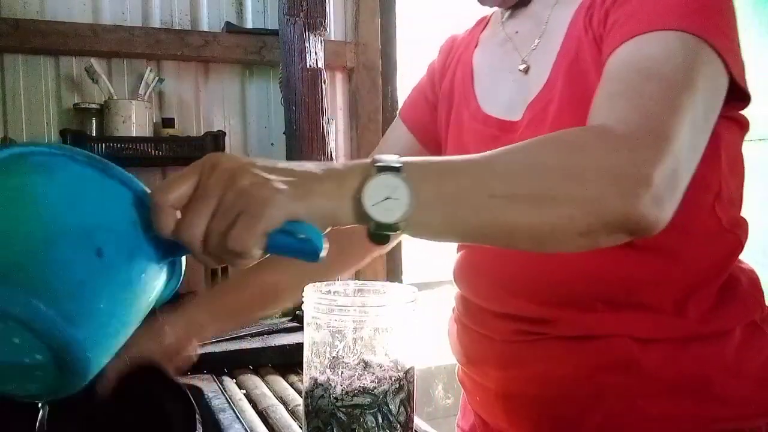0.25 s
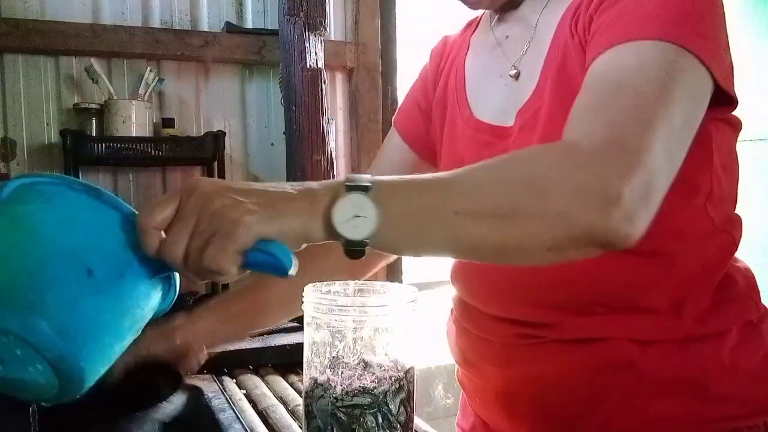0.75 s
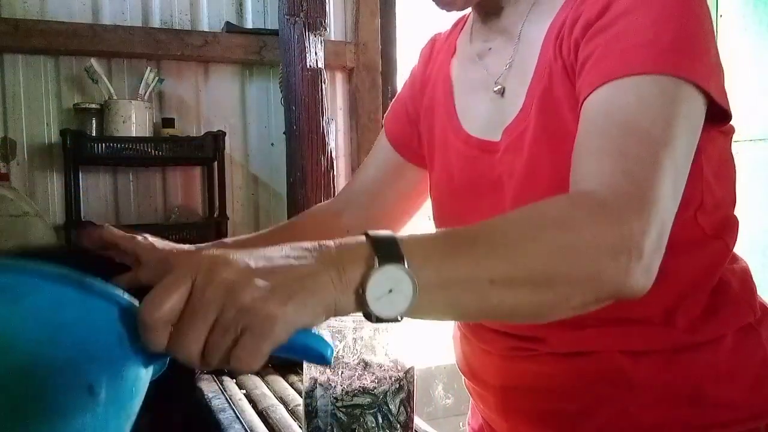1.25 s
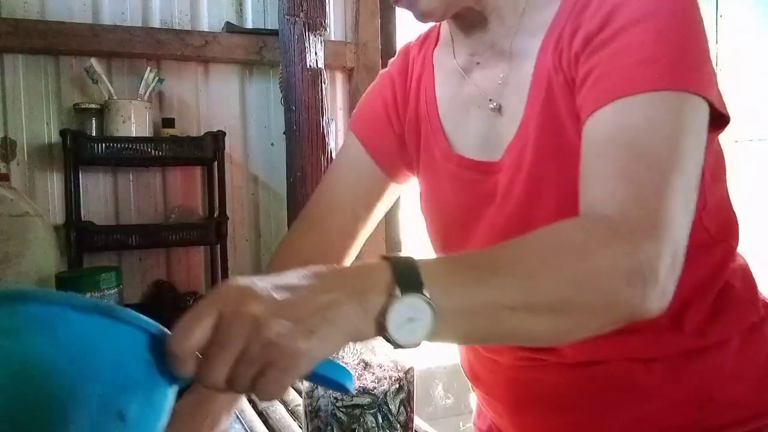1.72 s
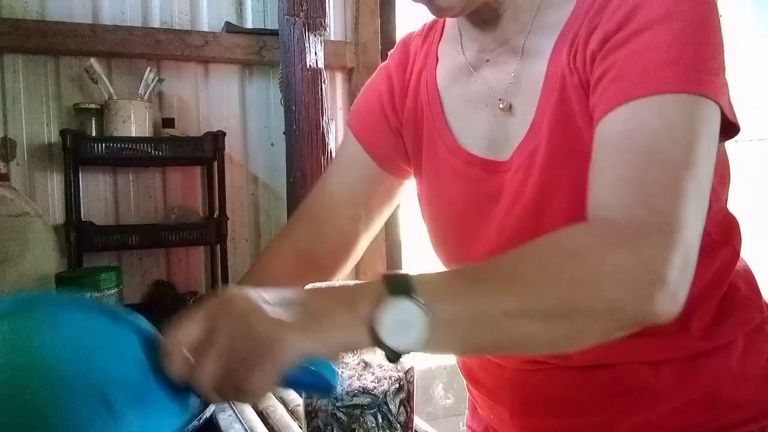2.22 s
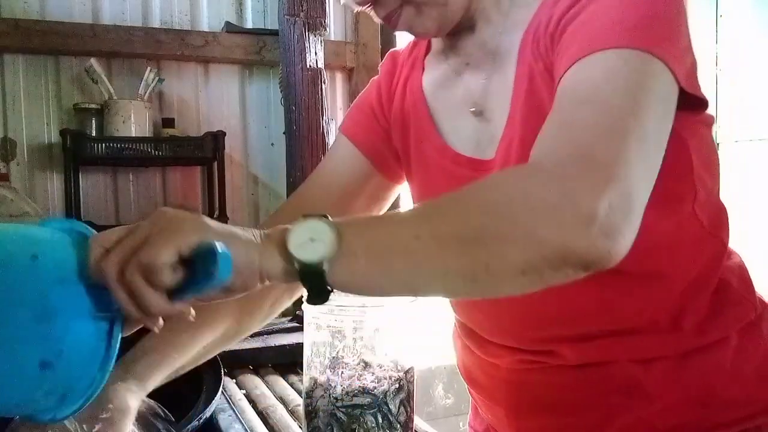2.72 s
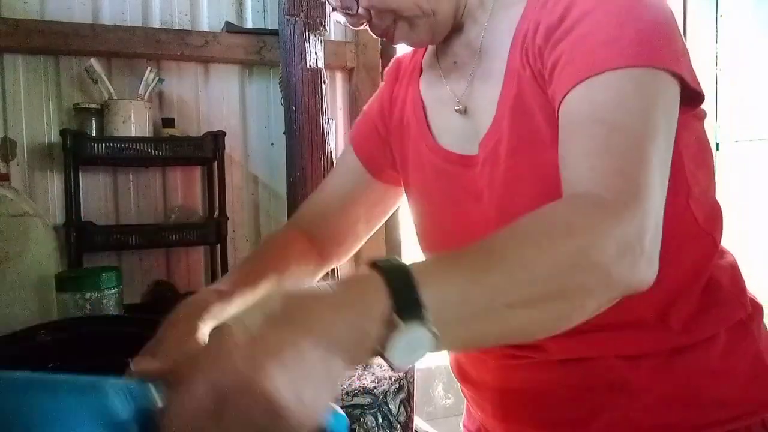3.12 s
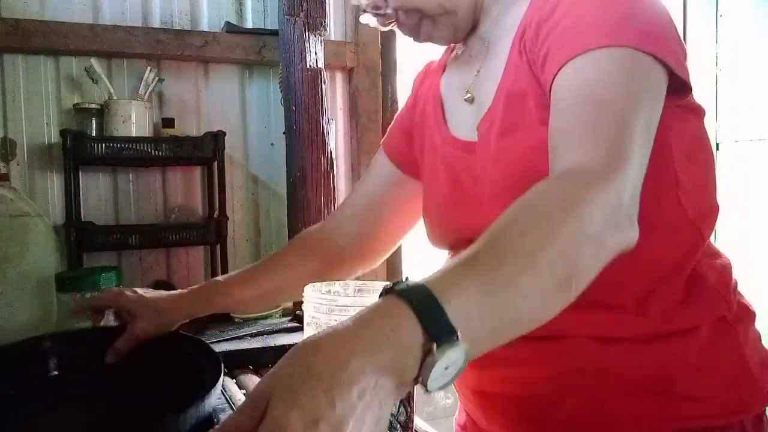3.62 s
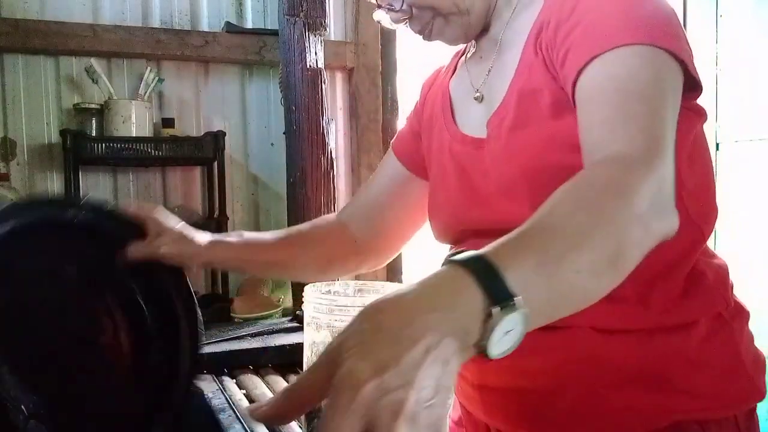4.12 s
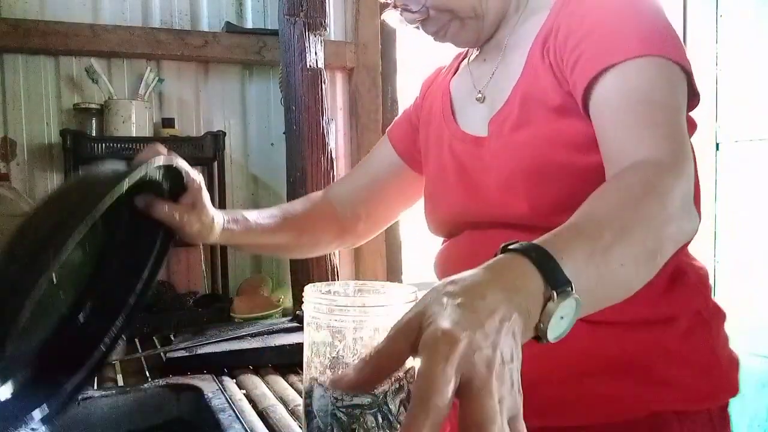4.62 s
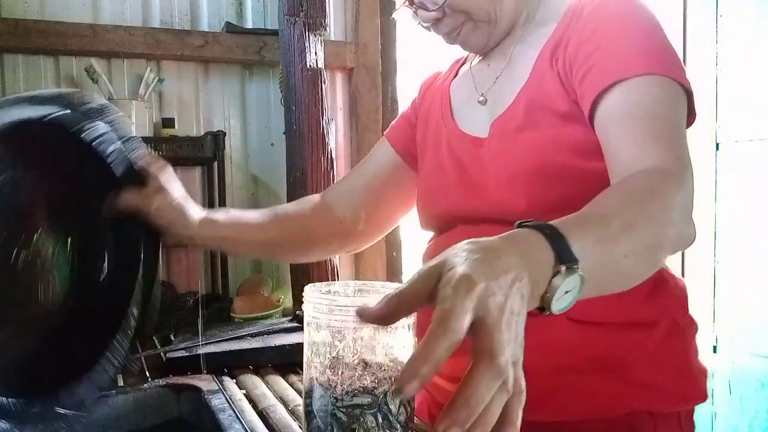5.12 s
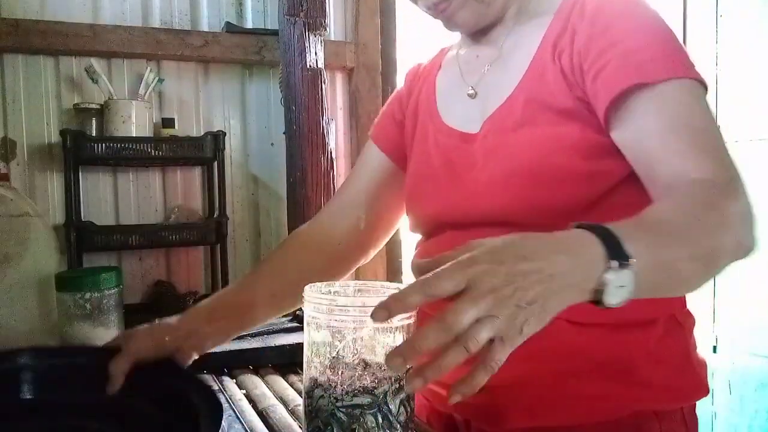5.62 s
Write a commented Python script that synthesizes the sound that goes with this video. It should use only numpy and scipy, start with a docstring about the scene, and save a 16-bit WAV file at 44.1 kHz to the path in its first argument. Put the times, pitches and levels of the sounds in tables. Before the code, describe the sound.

Close, at a sink in a small metal shed, water trickles and drips as a plastic dipper knocks a hollow basin. A tight cluster of booming bumps and a juddering shove comes early, then a bright splashing pour with gurgles. The water thins to drips and plops before a few ringing knocks on the emptied basin. Mono, with faint low rumble and hiss.

```python
"""A sink in a small sheet-metal shed: a plastic dipper bumps about in a basin and is poured out.
Water sprays, gurgles, plops and drips, built from swarms of bubbles, filtered noise and short rings.
Knocks are decaying modes plus bursts of noise; shoves of the basin judder as random slips ring its sides.
The last knocks fall on the drained basin and boom less but ring more. Low rumble and hiss lie under it all."""
import sys
import numpy as np
from scipy import signal
from scipy.fft import rfft, irfft, next_fast_len
from scipy.io import wavfile
from scipy.ndimage import map_coordinates

SR = 44100
rng = np.random.default_rng(int(sys.argv[2]) if len(sys.argv) > 2 else 0)


def transcribe(signal):
    """Save signal, clipped to [-1, 1], as a 16-bit WAV file at the path in sys.argv[1]."""
    frames = np.atleast_2d(signal).T
    limited = np.clip(frames, -1, 1)
    pcm = np.round(limited * 32767).astype(np.int16)
    wavfile.write(sys.argv[1], SR, pcm)


N = 258249  # length in samples


def amp(db):
    """Decibels to gain."""
    return 10 ** (np.asarray(db) / 20)


def unit(x):
    """Scaled to rms 1."""
    return x / np.sqrt(np.mean(x ** 2) + 1e-20)


def strike(x, window_s):
    """A blow scaled to rms 1 over its first moments."""
    return x / np.sqrt(np.mean(x[:int(window_s * SR)] ** 2) + 1e-20)


def along(points, hz):
    """(Hz, value) points read on a log axis."""
    f, v = np.transpose(points)
    return np.interp(np.log(hz + 1), np.log(f + 1), v)


def curves(rows):
    """One value per sample for each column after the time."""
    s, *cols = np.transpose(rows)
    return [np.interp(np.arange(N) / SR, s, c) for c in cols]


def fade(t, t60):
    """Gain of a ring that loses 60 dB in t60 seconds."""
    return np.exp(-np.log(1000) * t / t60)


def onset(t, rise_s):
    """Gain that swells from nothing towards 1 with time constant rise_s."""
    return 1 - np.exp(-t / rise_s)


def swells(rows, attack_s, t60):
    """Gain of (s, hold s, dB) events that each rise, hold and die away."""
    t = np.arange(N) / SR
    total = np.zeros(N)
    for s, hold, db in rows:
        attack = np.clip((t - s) / attack_s, 0, 1)
        release = fade(np.maximum(t - s - attack_s - hold, 0), t60)
        total += amp(db) * attack * release
    return total


def wobble(rate):
    """A smooth random curve, rate knots a second."""
    knots = rng.standard_normal(int(N * rate / SR) + 4)
    return map_coordinates(knots, [np.arange(N) * rate / SR])


def add(track, s, sound):
    """Mix a sound into the track at time s."""
    start = min(max(round(s * SR), 0), N)
    track[start:start + len(sound)] += sound[:N - start]


def colour(x, spectrum):
    """Causal minimum-phase filter with the given (Hz, dB) response, made by folding its cepstrum."""
    m = next_fast_len(len(x) + 4096, True)
    cepstrum = irfft(np.log(amp(along(spectrum, np.fft.rfftfreq(m, 1 / SR)))), m)
    cepstrum[1:m // 2] *= 2
    cepstrum[m // 2 + 1:] = 0
    return irfft(rfft(x, m) * np.exp(rfft(cepstrum)), m)[:len(x)]


def noise(spectrum, size):
    """Coloured noise of rms 1."""
    return unit(colour(rng.standard_normal(size), spectrum))


def resonate(x, hz, q):
    """One resonance of quality q."""
    return signal.lfilter(*signal.iirpeak(min(hz, SR / 2.5), max(q, 1), SR), x)


def ringing(modes, t):
    """Decaying modes, rms 1 at first; water and grip shift them a little from blow to blow."""
    chance = rng.standard_normal((len(modes), 3))
    total = np.zeros(len(t))
    for (hz, db, t60), (level, pitch, phase) in zip(modes, chance):
        wave = np.sin(2 * np.pi * hz * (1 + 0.00995 * pitch) * t + np.pi * phase)
        total += amp(db + 2 * level) * fade(t, t60) * wave
    return strike(total, 0.084)


def bubble(t, hz, cycles, rise):
    """A damped sine whose pitch climbs, for rise above 0, as the bubble nears the surface."""
    age = t * hz / cycles
    return np.sin(2 * np.pi * hz * t * (1 + rise * age / (2 + age))) * np.exp(-age)


def grains(rate, hz, spread, cycles, scatter_db, rise, size):
    """A steady swarm, rate a second, of size-sample bubbles of random pitch and strength, rms 1."""
    u = rng.random((int(rate * N / SR), 4))
    pitch = np.clip(hz * np.exp(spread * (u[:, 1:2] + u[:, 2:3] - 1)), 100, SR / 2.5)
    strength = amp(-scatter_db * np.log(0.02 + 0.98 * u[:, 3:]))  # many weak, few strong
    waves = strength * bubble(np.arange(size) / SR, pitch, cycles, rise)
    at = (u[:, :1] * N).astype(int) + np.arange(size)
    return unit(np.bincount(at.ravel(), waves.ravel(), N)[:N])


# how long the metal walls ring on. Each row: frequency in Hz, t60 in seconds
SHED_DECAY = [(100, 1), (400, 0.51), (1500, 0.19), (6000, 0.17), (15000, 0.18)]


def shed(x, wet_db):
    """Direct sound plus the walls' answer 2.7 ms later, whose treble dies sooner than its bass."""
    hz, t, z = signal.stft(rng.standard_normal(SR // 2), SR, nperseg=256)
    tail = signal.istft(z * fade(t, along(SHED_DECAY, hz)[:, None]), SR, nperseg=256)[1]
    tail = np.pad(tail / np.linalg.norm(tail), (int(0.0027 * SR), 0))
    return x + amp(wet_db) * signal.fftconvolve(x, tail)[:len(x)]


# low outdoor rumble. Each row: frequency in Hz, relative level in dB per Hz
RUMBLE_SPECTRUM = [(15, -68.5), (25, -38), (86, 2.5), (119, -9.5), (183, -3.5), (269, -25), (356, -30.5),
                   (469, -34), (574, -20.5), (680, -42.5), (1000, -51), (1300, -58), (2200, -120)]
# microphone hiss. Each row: frequency in Hz, relative level in dB per Hz
HISS_SPECTRUM = [(500, -35), (1500, 1), (3000, -18.5), (8000, 1.5), (13500, -18), (14500, -31.5),
                 (15300, -8), (16000, -1.5)]
RUMBLE_DB, HISS_DB = -62, -64


def background():
    """Low outdoor rumble and the microphone's hiss, both steady coloured noise."""
    return amp(RUMBLE_DB) * noise(RUMBLE_SPECTRUM, N) + amp(HISS_DB) * noise(HISS_SPECTRUM, N)


# water running off dipper and basin before the big pour. Each row: time in seconds, spray level in dB
TRICKLE_BEFORE_POUR = [(0.0, -46.5), (0.34, -71.5), (0.61, -59), (0.89, -44), (0.98, -46.5), (1.11, -49.5),
                       (1.61, -43.5), (1.78, -47.5), (2.43, -53), (2.7, -50)]
# the same after the big pour. Each row: time in seconds, spray level in dB
TRICKLE_AFTER_POUR = [(3.35, -52.5), (3.5, -54), (3.69, -44), (3.98, -52), (4.23, -47), (5.28, -53.5),
                      (5.85, -51)]


def trickle():
    """Level in dB of the running water before its flutter, one value per sample."""
    return curves(np.vstack([TRICKLE_BEFORE_POUR, TRICKLE_AFTER_POUR]))[0]


# the dipper tipped out. Each row: start in seconds, hold in seconds, spray level in dB before flutter
DIPPER_POURS = [(1.0, 0.032, -49.5), (2.73, 0.17, -37), (4.26, 0.023, -60)]
POUR_ATTACK_S, POUR_T60_S = 0.14, 1
# the basin's water set rocking. Each row: start in seconds, hold in seconds, gurgle level in dB
BASIN_SLOSHES = [(1.08, 0.23, -56), (1.65, 0.13, -44), (2.04, 0.15, -50), (2.86, 0.42, -50),
                 (3.72, 0.42, -56), (5.06, 0.24, -64.5)]
SLOSH_ATTACK_S, SLOSH_T60_S = 0.019, 0.37
# filter on the falling spray. Each row: frequency in Hz, relative gain in dB
SPRAY_FILTER = [(500, -24.5), (1200, -9.5), (2000, -10.5), (2700, -8), (3700, -6), (5200, -2), (6500, 4),
                (7500, 5), (9400, -5), (12200, -4), (13600, -6), (15000, 11), (16000, -13.5)]
# filter on bubbles under water. Each row: frequency in Hz, relative gain in dB
GURGLE_FILTER = [(150, -8.5), (350, 8), (700, -4.5), (1300, -3.5), (2200, -3.5), (3000, 2.5), (4500, 5.5),
                 (8000, -38.5)]
FLUTTER_PER_S, FLUTTER_DB = 22, 2.67  # the stream breaks up unevenly
# the gurgle under a spray of MID_FLOW_DB, and its dB per dB of spray
MID_FLOW_DB, GURGLE_DB, GURGLE_GROWS = -45, -64.5, 2.35


def water():
    """Falling water: a spray of tiny bursts and droplets over a gurgle of bubbles."""
    flow = np.hypot(amp(trickle()), swells(DIPPER_POURS, POUR_ATTACK_S, POUR_T60_S))
    flow = flow * amp(FLUTTER_DB * wobble(FLUTTER_PER_S))
    spray_db = 20 * np.log10(flow)
    # a stronger flow drives more air under; rocking water gurgles too
    driven = amp(GURGLE_DB + GURGLE_GROWS * (spray_db - MID_FLOW_DB))
    churn = np.hypot(driven, swells(BASIN_SLOSHES, SLOSH_ATTACK_S, SLOSH_T60_S))

    bursts = grains(rate=380, hz=7780, spread=1.78, cycles=1.0, scatter_db=9.5, rise=0, size=64)
    droplets = grains(rate=160, hz=4800, spread=0.9, cycles=4, scatter_db=4, rise=0.05, size=300)
    fizz = grains(rate=9000, hz=6000, spread=1.3, cycles=0.6, scatter_db=3, rise=0, size=48)
    # a trickle falls as separate droplets; in a full pour they merge into fizz
    merged = np.interp(spray_db, [-52, -40], [0.25, 0.85])
    separate = unit(bursts + amp(-2) * droplets)
    spray = np.sqrt(1 - merged) * separate + np.sqrt(merged) * fizz
    spray = colour(spray + amp(-12) * rng.standard_normal(N), SPRAY_FILTER)

    bubbles = grains(rate=600, hz=2100, spread=1.3, cycles=1.8, scatter_db=2.5, rise=0.15, size=900)
    gurgle = colour(bubbles + amp(-1.5) * rng.standard_normal(N), GURGLE_FILTER)
    return flow * unit(shed(spray, wet_db=-2)) + churn * unit(shed(gurgle, wet_db=0))


# the largest air pockets closing in the water. Each row: start in seconds, level in dB, pitch in Hz
AIR_POCKETS = [(0.051, -47.5, 1140), (0.241, -59.5, 1180), (0.58, -53, 5960), (0.868, -47, 2780),
               (0.955, -46, 2650), (0.975, -45.5, 2740), (1.076, -45.5, 2760), (2.106, -43, 2500),
               (2.472, -44, 2680), (3.843, -43, 1260), (4.326, -50.5, 1500), (4.4, -46, 1240),
               (4.52, -52, 505), (4.546, -56.5, 750), (4.563, -48.5, 1560), (4.675, -52, 1920),
               (4.842, -49.5, 2100), (4.936, -45.5, 1014), (5.123, -48, 980), (5.198, -54, 1350),
               (5.728, -38.5, 1090), (5.805, -40, 1240)]
# cycles of ring at 1 kHz, and the power of pitch by which smaller bubbles ring for more cycles
PLOP_CYCLES, PLOP_CYCLES_POWER = 3.5, 1.4
SLAP_DB = 1  # the slap of closing over the ring


def plops():
    """Larger bubbles slap shut and ring, rising in pitch."""
    out, t = np.zeros(N), np.arange(SR // 5) / SR
    for s, db, hz in AIR_POCKETS:
        cycles = PLOP_CYCLES * (hz / 1000) ** PLOP_CYCLES_POWER
        gulp = bubble(t, hz, cycles, rise=0.23) * onset(t, 0.00018)
        slap = resonate(noise(GURGLE_FILTER, len(t)) * fade(t, 0.1), hz, q=6)
        plop = shed(unit(gulp) + amp(SLAP_DB) * unit(slap), wet_db=-7)
        add(out, s, amp(db) * strike(plop, 0.008))
    return out


# the heaviest drops on wet surfaces. Each row: start in seconds, nominal peak in dB, ring in Hz
HEAVY_DROPS = [(0.0648, -34, 6200), (0.6764, -34.5, 8150), (0.846, -28.5, 5000), (1.056, -27, 2920),
               (1.1044, -26, 6840), (1.1264, -25, 7100), (1.8186, -28.5, 5060), (2.0397, -29, 6860),
               (2.1275, -29, 2680), (2.259, -26, 7200), (2.27, -22, 7000), (2.471, -31, 2560),
               (2.6234, -30.5, 6800), (2.818, -24, 6800), (2.8413, -23, 8140), (2.8882, -16, 6540),
               (3.048, -22.5, 6150), (3.12, -23, 6240), (3.326, -35, 6500), (3.4171, -35, 3370),
               (3.507, -19.5, 5150), (3.75, -25.5, 6800), (3.858, -28.5, 4680), (4.0896, -30, 7140),
               (4.24, -24.5, 6350), (4.3594, -30.5, 5900), (4.3967, -29.5, 3500), (4.805, -28.5, 6650),
               (4.9162, -29, 6900), (5.1964, -32.5, 5600), (5.3936, -39, 7600), (5.4495, -27, 5530),
               (5.5163, -24, 4670)]
# a drop's impact. Each row: frequency in Hz, relative level in dB
SPLAT_SPECTRUM = [(300, -57), (1200, -7), (2000, -1), (2800, -1), (5000, 1.5), (7000, 3), (9500, -4.5),
                  (13000, -11), (15300, -16)]
RING_DB, RING_SCATTER_DB = 0, 8  # the wet surface's ring over the splat


def drops(rows):
    """A drop splats as a short noise burst and the wet surface rings briefly."""
    out, t = np.zeros(N), np.arange(SR // 5) / SR
    for s, db, hz in rows:
        ring_db = RING_DB + RING_SCATTER_DB * rng.standard_normal()
        splat = unit(noise(SPLAT_SPECTRUM, len(t)) * fade(t, 0.062) * onset(t, 0.00053))
        ring = unit(resonate(splat, hz, q=4.3))
        drop = strike(shed(splat + amp(ring_db) * ring, wet_db=-3), 0.007)
        add(out, s, amp(db - 12.5) * drop)  # early rms set 12.5 dB under the nominal peak
    return out


DRIPS_PER_S, DRIP_DB, DRIP_SCATTER_DB = 7, 11, 4  # nominal peak in dB over the trickle
DRIP_HZ, DRIP_SPREAD = 6900, 0.13  # their ring and its relative spread


def drips():
    """Light drips at random moments, following the trickle that feeds them: rows like HEAVY_DROPS."""
    chance = rng.uniform(-1.3, 1, (int(DRIPS_PER_S * N / SR), 3))
    times = (np.arange(len(chance)) + 0.5 + 0.5 * chance[:, 0]) / DRIPS_PER_S
    trickle_db = np.interp(times, np.arange(N) / SR, trickle())
    levels = trickle_db + DRIP_DB + DRIP_SCATTER_DB * chance[:, 1]
    return list(zip(times, levels, DRIP_HZ * np.exp(DRIP_SPREAD * chance[:, 2])))


# plastic bumping on basin and sink.
# Each row: start in seconds, boom in dB before BOOM_TRIM_DB, wall clack in dB, leading mode in Hz
BUMPS = [(0.339, -30.5, -27, 456.7), (0.754, -32, -23.5, 369), (0.802, -34.5, -41, 370),
         (0.9, -45.5, -34, 364), (1.308, -30, -31, 433), (1.363, -33.5, -34.5, 405),
         (1.385, -28.5, -19, 370), (1.478, -26.5, -22.5, 469), (1.59, -34.5, -27, 591),
         (1.689, -34.5, -29, 360), (1.704, -37.5, -15.5, 373), (1.759, -33.5, -29.5, 369),
         (1.878, -46.5, -34, 482), (2.037, -50.5, -47, 399), (2.053, -46, -37, 398),
         (2.205, -49.5, -37, 436), (2.28, -43, -82, 364), (3.257, -50, -34.5, 555),
         (3.569, -42, -33.5, 679), (3.623, -41.5, -41.5, 439), (3.638, -29.5, -27, 440),
         (3.8, -43.5, -38.5, 380.5), (3.94, -48.5, -34, 591), (3.976, -54.5, -34.5, 408),
         (5.604, -26, -24.5, 420.3), (5.767, -37, -23, 411), (5.822, -39, -27.5, 575)]
# the hollow basin's sides. Each row: frequency in Hz, relative level in dB, t60 in seconds
BASIN_SIDES = [(305.4, 3, 0.6), (343, -11.5, 1), (381.4, -0.5, 0.69), (470, 5.5, 0.4), (584, 2.5, 0.34),
               (648, -8.5, 0.65), (710, -31, 0.1), (848, -13, 0.1), (910, -1, 0.38), (988, -6, .28),
               (1162, -12.5, 0.43), (1487, -1.5, 0.24)]
# the basin's bottom flexing. Each row: frequency in Hz, relative level in dB, t60 in seconds
BASIN_BOTTOM = [(117.3, -6.5, 0.67), (148.3, -7.5, 1), (174.5, 0.5, 0.76), (189.6, -1.5, 0.51),
                (211.8, 1.5, 0.47), (241, -1, 0.61)]
# crowded modes of the boom. Each row: frequency in Hz, relative level in dB
BOOM_SPECTRUM = [(80, -83), (180, -19.5), (300, -1), (420, 7), (600, -3.5), (900, -5.5), (1400, -17.5),
                 (2000, -10), (3000, -43), (8000, -99)]
# clack of the stiff wall. Each row: frequency in Hz, relative level in dB
CLACK_SPECTRUM = [(150, -35), (500, 4.5), (850, -17.5), (1080, 2), (1340, 4), (1700, 2), (2200, -3.5),
                  (2800, -0.5), (4000, -8.5), (9000, -89)]
# crack at the contact. Each row: frequency in Hz, relative level in dB
CRACK_SPECTRUM = [(800, -48.5), (2500, 3.5), (4000, 4.5), (5000, 2), (6300, 5.5), (7800, 1.5),
                  (9500, -10.5), (13000, -17.5), (16000, -21)]
BOOM_TRIM_DB = -3
FIRM_DB = -30.5  # a firm bump, for which CRACK_DB and THUD_DB hold
CRACK_DB, CRACK_GROWS = -29.5, 0.94  # the contact crack, and its dB per dB of clack
THUD_DB, THUD_GROWS = -42, 0.72  # the shed's low thud, and its dB per dB of boom
# the bottom's flexing over the boom; dB lost per dB of clack over boom (a harder blow)
BELLY_DB, BELLY_LOSS = -2, 0.1
WALL_HZ, WALL_SPREAD = 1264, 0.037  # the wall's resonance, and its relative shift with the place of the blow
# once the basin is drained its bottom booms less and its wall rings more
EMPTY_S, EMPTY_BELLY_DB, EMPTY_WALL_DB = 5.4, -6.5, 13.5


def knocks():
    """Each bump cracks, clacks in the stiff wall, booms in the basin and sets off the shed's low resonance."""
    out, t = np.zeros(N), np.arange(SR // 2) / SR
    for s, boom_db, clack_db, mode_hz in BUMPS:
        empty = s > EMPTY_S
        crack_db = CRACK_DB + CRACK_GROWS * (clack_db - FIRM_DB)
        thud_db = THUD_DB + THUD_GROWS * (boom_db - FIRM_DB)
        belly_db = BELLY_DB - BELLY_LOSS * (clack_db - boom_db) + EMPTY_BELLY_DB * empty
        wall_hz = WALL_HZ * np.exp(WALL_SPREAD * rng.standard_normal())

        # the place of the blow and the water inside decide which mode leads
        main = strike(np.sin(2 * np.pi * mode_hz * t) * fade(t, 0.47) * onset(t, 0.0069), 0.033)
        crowd = strike(noise(BOOM_SPECTRUM, len(t)) * fade(t, 0.33), 0.086)
        modes = amp(2.5) * ringing(BASIN_SIDES, t) + amp(1) * main + amp(5.5) * crowd
        boom = strike(modes, 0.13) * onset(t, 0.0002)
        belly = ringing(BASIN_BOTTOM, t) * onset(t, 0.00082)
        thud = np.sin(2 * np.pi * 55.5 * t) * fade(t, 0.59) * onset(t, 0.035)
        body = amp(boom_db + BOOM_TRIM_DB) * (boom + amp(belly_db) * belly)
        add(out, s, body + amp(thud_db) * thud)

        # clack and crack each die fast, then leave a weaker, longer tail
        wall = noise(CLACK_SPECTRUM, len(t))
        wall = wall + amp(-16 + EMPTY_WALL_DB * empty) * unit(resonate(wall, wall_hz, q=13))
        clack = wall * (fade(t, 0.017) + amp(-15) * fade(t, 0.21))
        crack = noise(CRACK_SPECTRUM, len(t)) * (fade(t, 0.019) + amp(-10.5) * fade(t, 0.15))
        contact = amp(clack_db) * strike(clack, 0.012) + amp(crack_db) * strike(crack, 0.0048)
        add(out, s, shed(contact * onset(t, 0.0028), wet_db=-11.5))
    return out


# the basin shoved along the sink.
# Each row: start in seconds, hold in seconds, judder level in dB before DRAG_TRIM_DB
BASIN_SHOVES = [(1.385, 0.056, -24), (1.47, 0.069, -20.5), (2.03, 0.12, -53), (2.275, 0.024, -53),
                (5.63, 0.059, -31), (5.73, 0.082, -31)]
# filter on the slips. Each row: frequency in Hz, relative gain in dB
JUDDER_FILTER = [(60, -27), (120, -5.5), (190, -42), (270, -5), (400, 0.5), (600, -2), (800, -5),
                 (1150, -3.5), (1700, -17.5), (3000, -21.5), (8000, -42)]
SHOVE_ATTACK_S, SHOVE_T60_S = 0.024, 0.14
SLIPS_PER_S, DRAG_TRIM_DB = 220, -6.5


def drag():
    """The basin's base sticks and slips on the sink; the slips judder and keep its sides ringing."""
    level = swells(BASIN_SHOVES, SHOVE_ATTACK_S, SHOVE_T60_S)
    impulses = (rng.random(N) < SLIPS_PER_S / SR) * rng.standard_normal(N)
    slips = colour(impulses, JUDDER_FILTER)
    sides = sum(amp(db) * resonate(slips, hz, q=35) for hz, db, _ in BASIN_SIDES)
    judder = shed(unit(slips) + amp(-7) * unit(sides), wet_db=-0.5)
    return amp(DRAG_TRIM_DB) * level * unit(judder)


def scene():
    """Everything at the sink, mixed to one channel."""
    falling = water() + plops() + drops(HEAVY_DROPS) + drops(drips())
    return (background() + falling + knocks() + drag())[None]


TOP_HZ = 15750  # band limit


def record(dry):
    """Keeps nothing from the band limit up."""
    m = next_fast_len(N + SR // 2)
    return irfft(rfft(dry, m) * (np.fft.rfftfreq(m, 1 / SR) < TOP_HZ), m)[..., :N]


dry = scene()
out = record(dry)
transcribe(out)
```